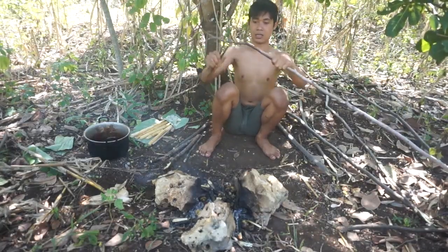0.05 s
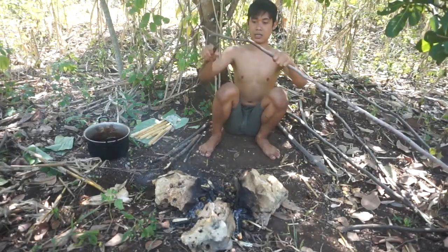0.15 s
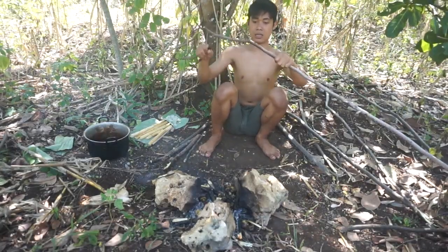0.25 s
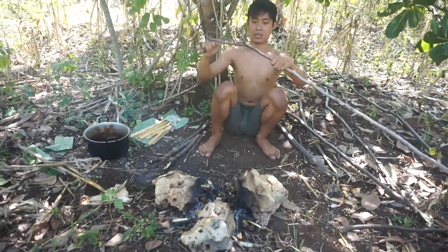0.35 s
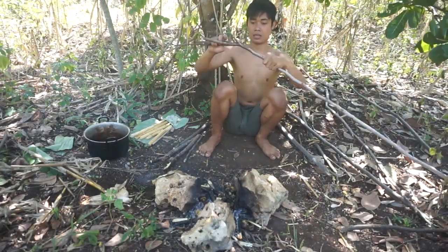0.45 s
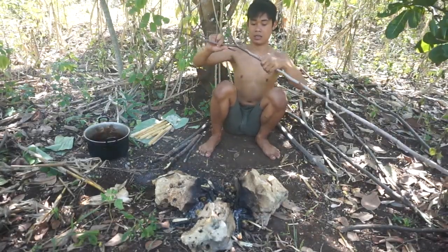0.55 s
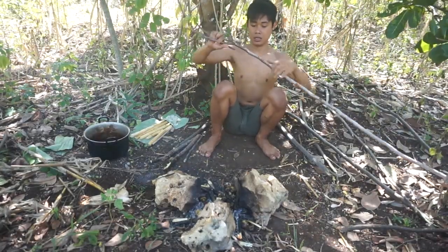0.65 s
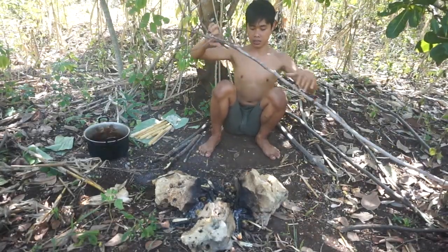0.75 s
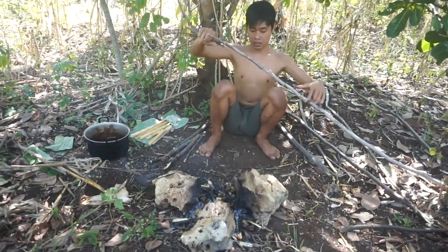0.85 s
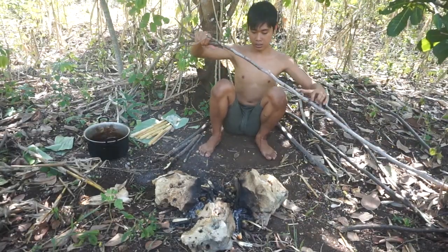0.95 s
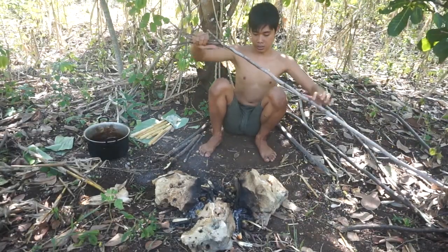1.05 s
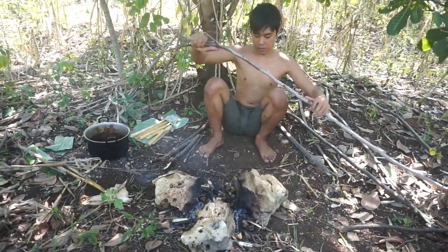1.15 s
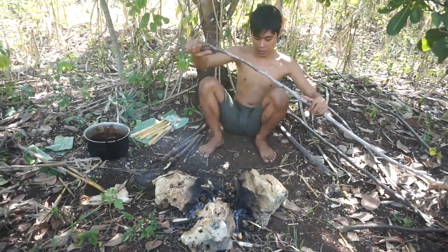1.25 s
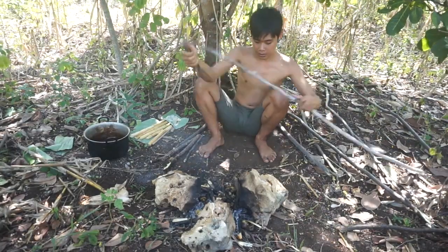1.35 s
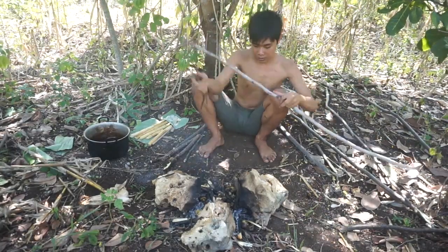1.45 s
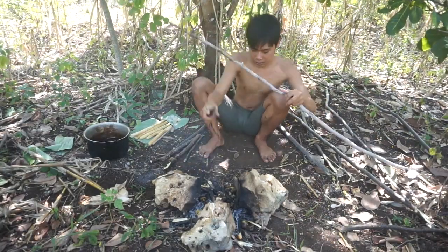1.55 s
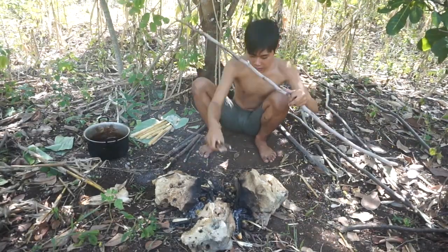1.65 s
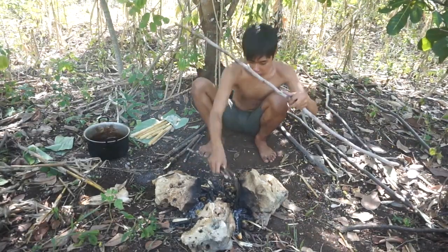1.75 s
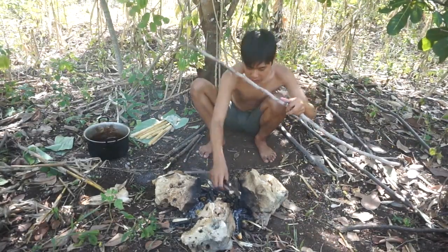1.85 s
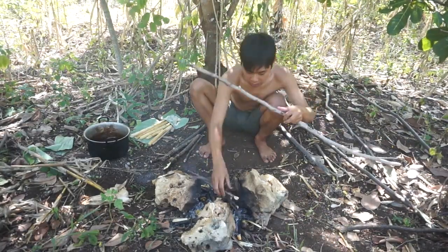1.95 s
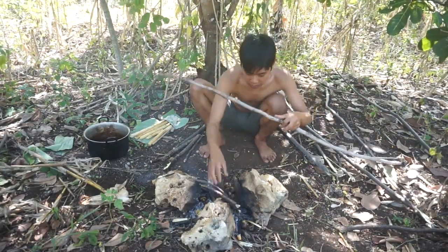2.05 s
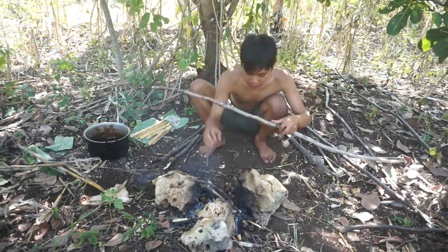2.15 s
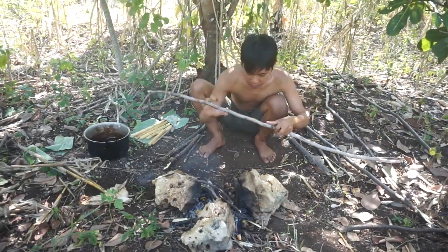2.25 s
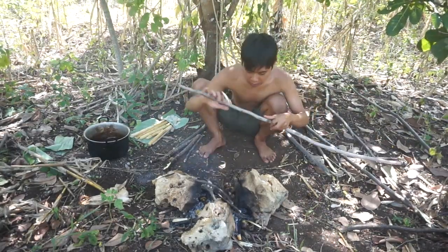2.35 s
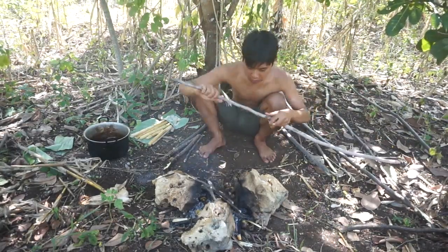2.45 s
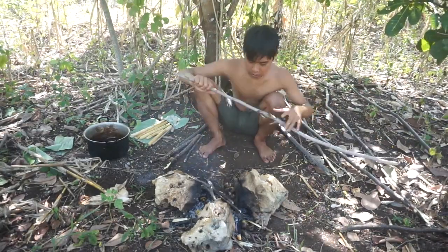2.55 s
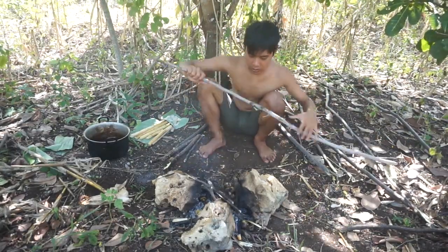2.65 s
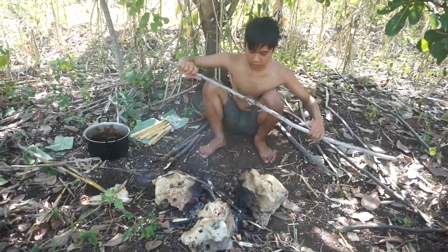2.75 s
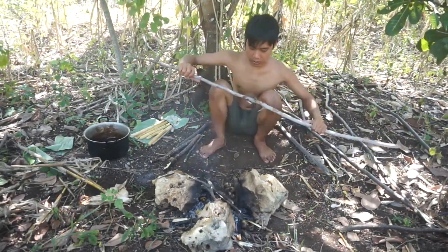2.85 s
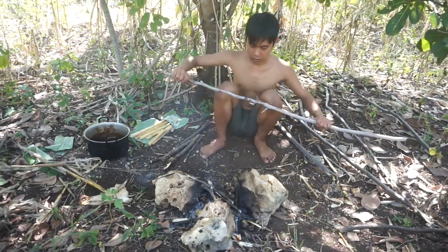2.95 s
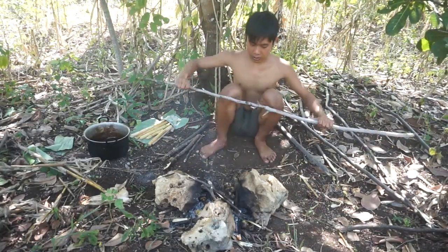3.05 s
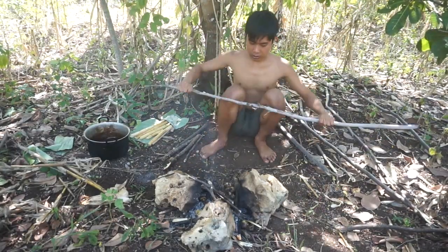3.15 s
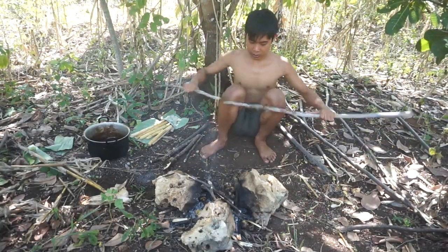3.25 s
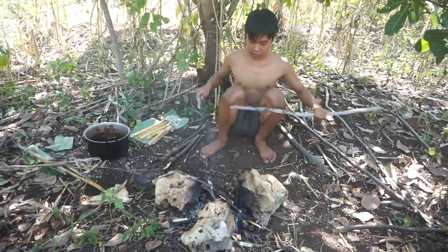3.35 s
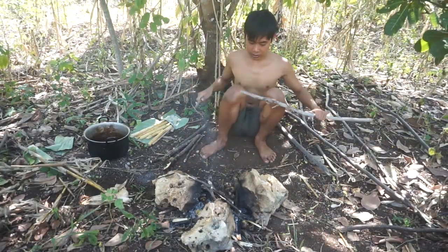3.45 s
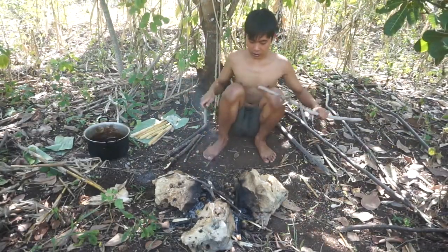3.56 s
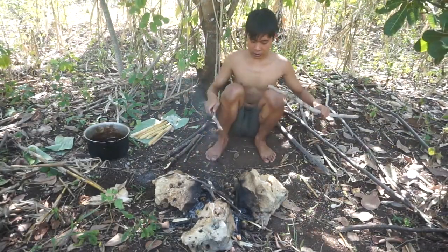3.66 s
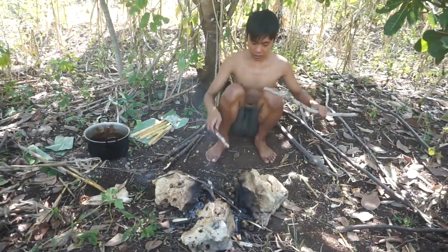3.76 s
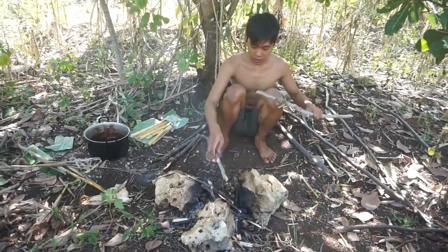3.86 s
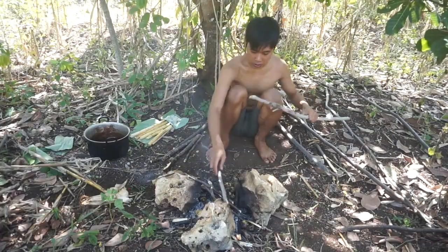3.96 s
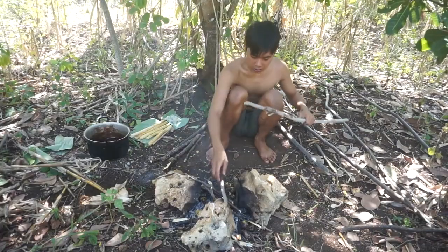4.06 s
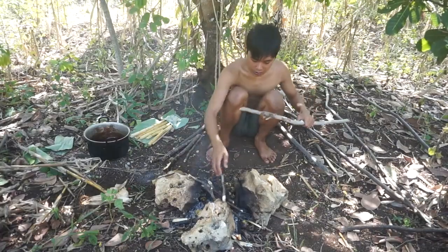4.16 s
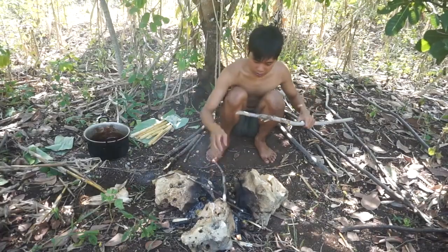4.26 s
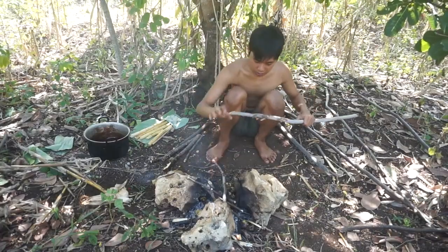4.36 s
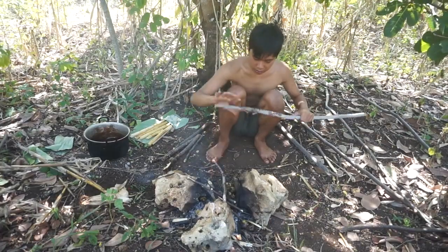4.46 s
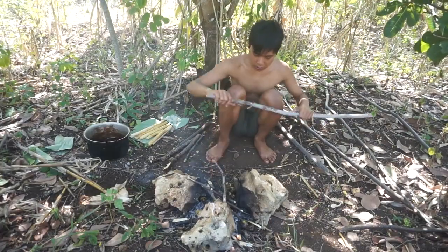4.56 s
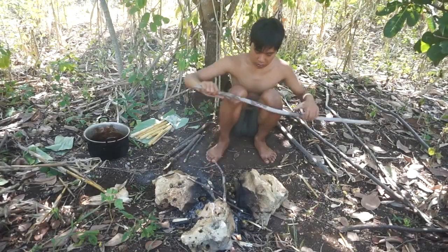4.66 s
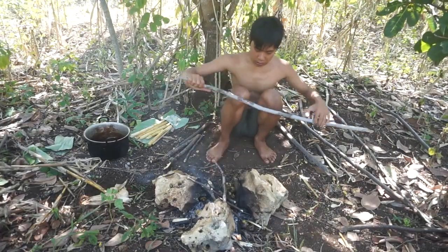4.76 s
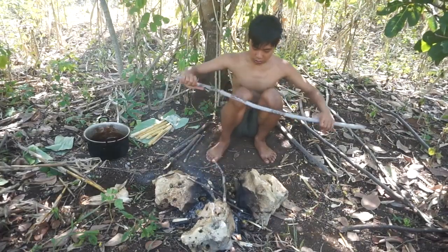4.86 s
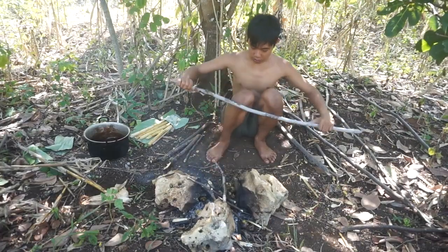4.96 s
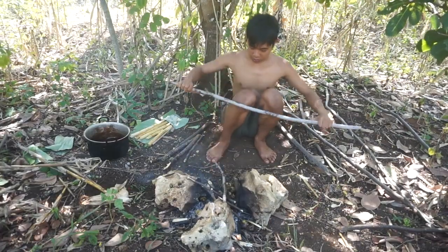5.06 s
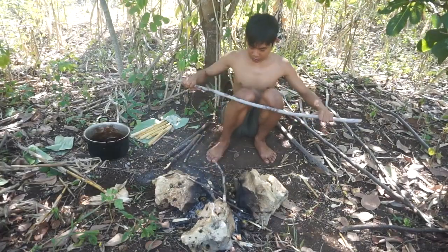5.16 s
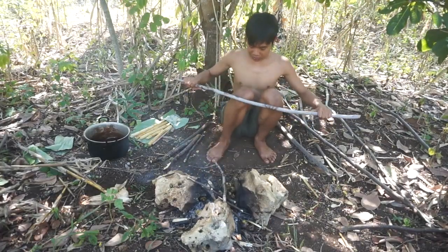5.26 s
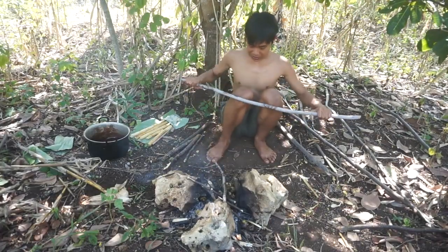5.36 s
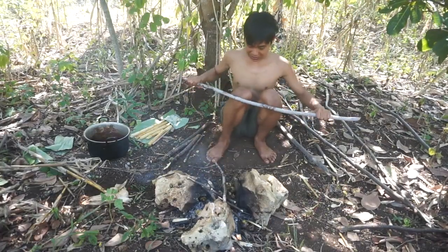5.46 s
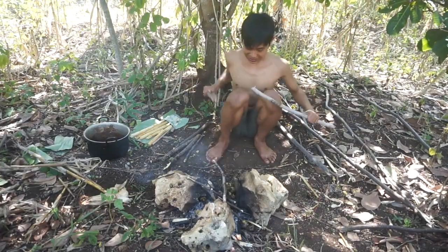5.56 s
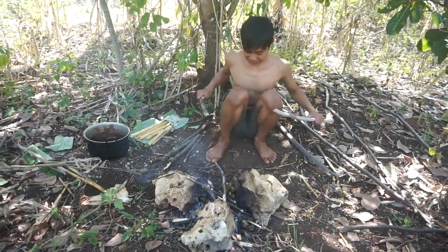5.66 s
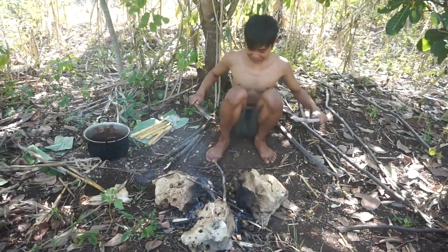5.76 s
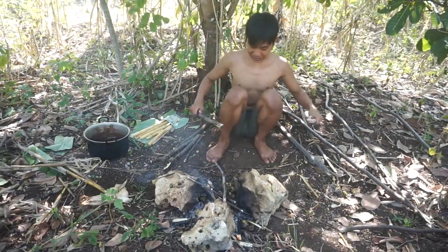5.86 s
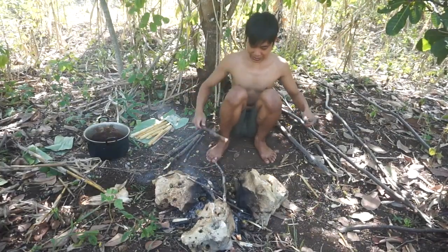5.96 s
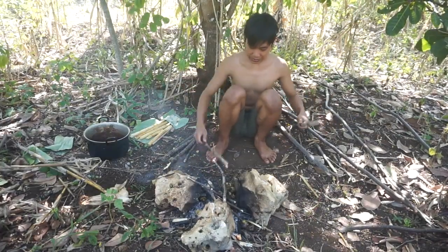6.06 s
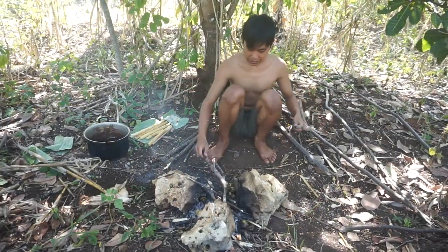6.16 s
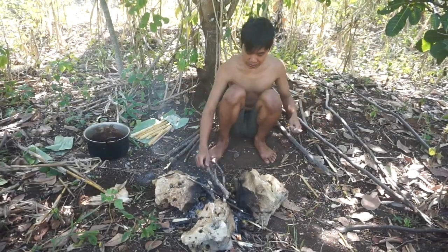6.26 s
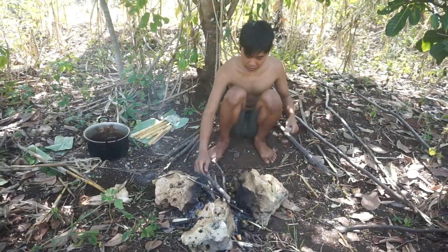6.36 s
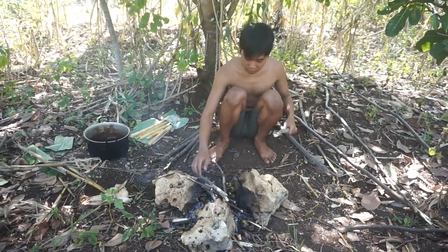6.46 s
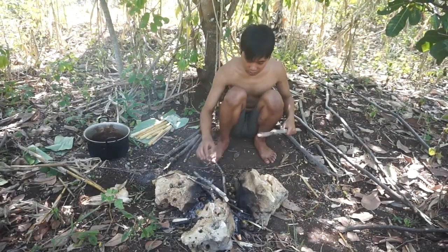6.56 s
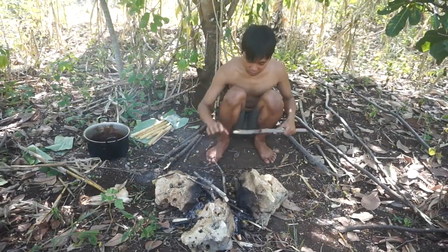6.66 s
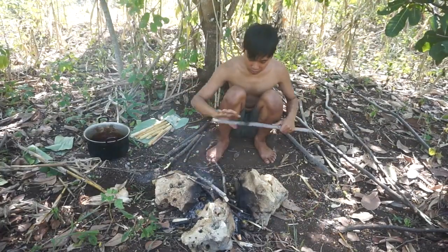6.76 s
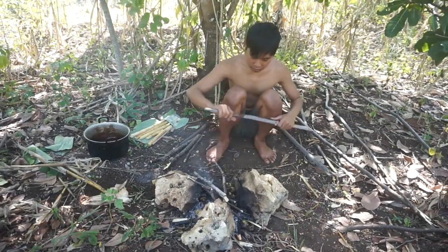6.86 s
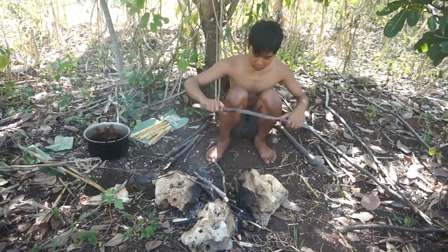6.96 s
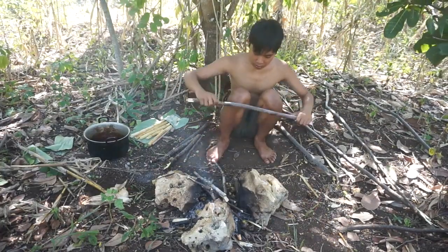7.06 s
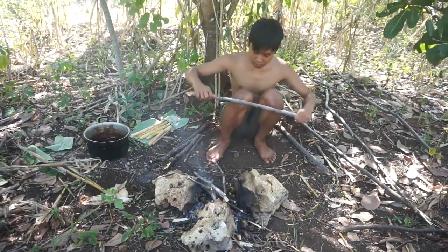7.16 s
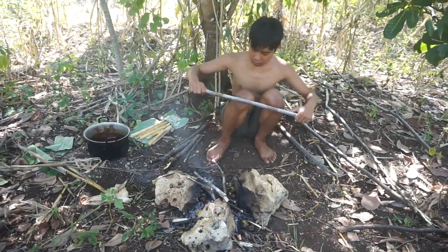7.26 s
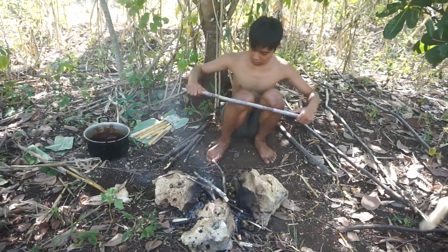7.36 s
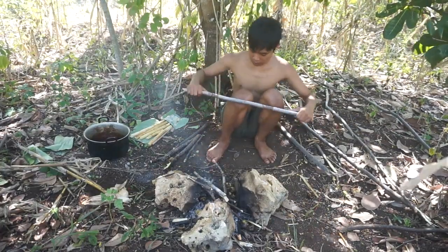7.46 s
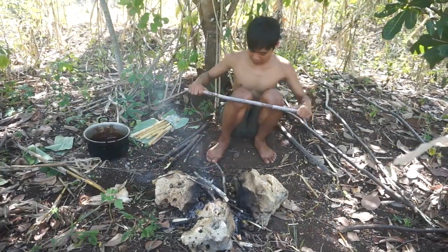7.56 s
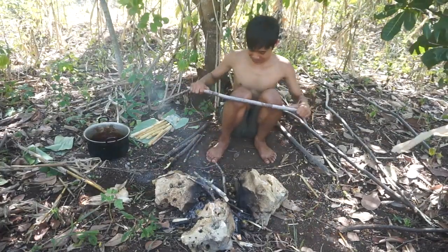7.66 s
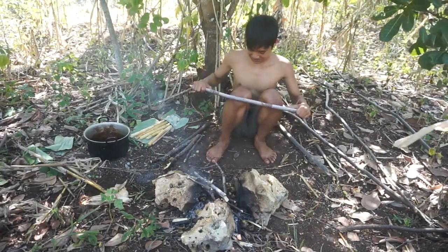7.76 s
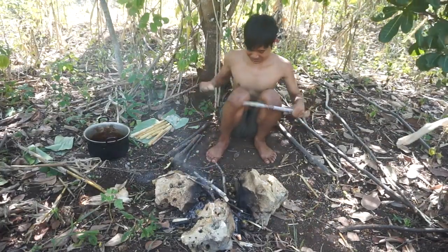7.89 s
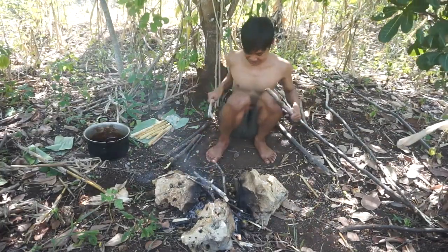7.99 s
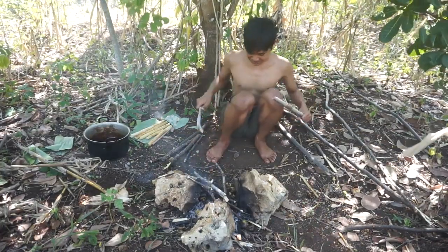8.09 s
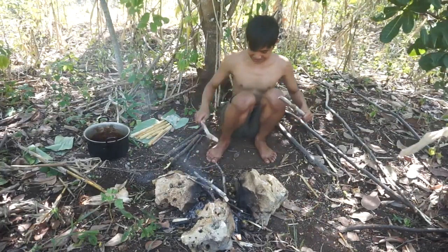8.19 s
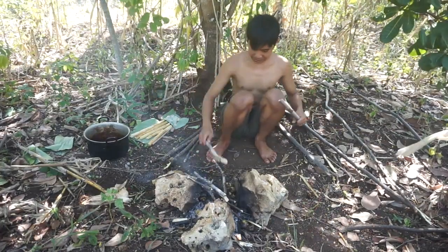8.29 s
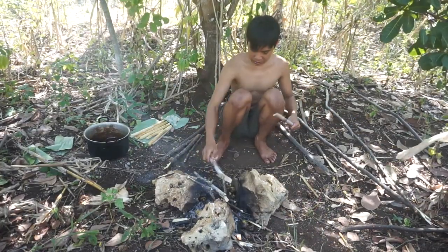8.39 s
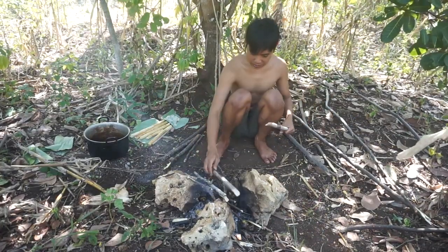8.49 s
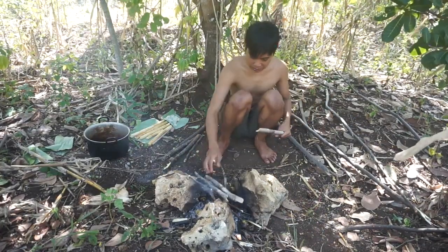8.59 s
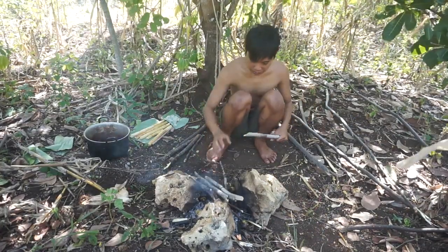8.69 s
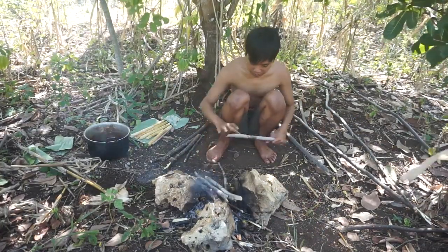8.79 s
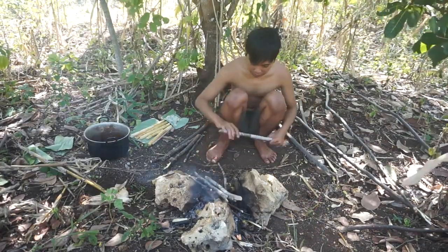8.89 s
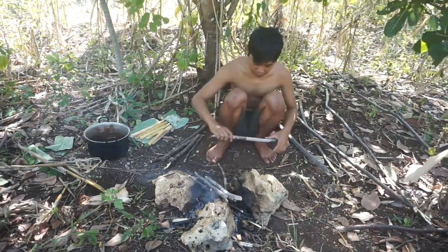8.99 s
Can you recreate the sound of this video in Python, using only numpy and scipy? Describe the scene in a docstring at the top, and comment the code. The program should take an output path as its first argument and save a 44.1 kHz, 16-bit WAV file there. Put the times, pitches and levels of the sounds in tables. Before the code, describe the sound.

Dry leaves crackle under a dragged stick in a faint breezy hush, with small woody taps. Four very loud, short, brittle snaps stand far above everything else, with bright splintering and a quick diffuse tail. Between them come low wind puffs, sparse knocks and thin gliding whistles of a far bird. The open-air microphone's automatic level drops at each snap, then slowly recovers.

```python
"""Dry leaves rustle under a dragged stick in a breezy hush; a light knock of wood follows at once.
Someone crouching by a small wood fire outdoors drags the long stick and breaks it four times.
Small fibre cracks lead up to most breaks; each snap excites wood resonances and scatters back as noise.
Faint gliding calls come from afar. Gusts, noise carried past two ports, buffet the microphone,
whose gain control ducks at every break and creeps back up."""
import sys
import numpy as np
from scipy import signal
from scipy.fft import rfft, irfft
from scipy.io import wavfile
from scipy.ndimage import uniform_filter1d

SR = 44100
rng = np.random.default_rng(int(sys.argv[2]) if len(sys.argv) > 2 else 0)


def materialize(psi):
    """Save the field psi as 16-bit PCM at rate SR to the path in sys.argv[1].

    A 1-D psi becomes a single channel; in a 2-D psi each row is a channel.
    """
    bounded = np.clip(np.atleast_2d(psi).T, -1, 1)
    quanta = np.round(bounded * 32767).astype(np.int16)
    wavfile.write(sys.argv[1], SR, quanta)


N = 398223
TIME = np.arange(N) / SR
BAND_EDGES_HZ = np.geomspace(25, 12800, 19)   # half octaves


def from_db(db):
    """Decibels to amplitude gain."""
    return 10 ** (np.asarray(db) / 20)


def rms_one(x):
    """Scale to rms 1."""
    return x / np.sqrt(np.mean(x ** 2) + 1e-20)


def as_hit(x):
    """Scale a hit to the energy of 3 ms at rms 1."""
    return x / np.sqrt(np.sum(x ** 2) / (.003 * SR) + 1e-20)


def in_time(rows):
    """Breakpoints (t/s, value) interpolated at every sample."""
    return np.interp(TIME, *np.transpose(rows))


def at_hz(rows, hz, axis=1):
    """One table column interpolated over log frequency."""
    rows = np.array(rows)
    return np.interp(np.log(hz), np.log(rows[:, 0]), rows[:, axis])


def band(x, low_hz, high_hz, order=2):
    """Causal Butterworth band-pass."""
    edges_hz = [low_hz, min(high_hz, SR / 2 - 1)]
    sos = signal.butter(order, edges_hz, "band", fs=SR, output="sos")
    return signal.sosfilt(sos, x + 1e-18)


def resonance(x, hz, width_hz):
    """Two-pole resonance, peak gain about 1."""
    r = np.exp(-np.pi * width_hz / SR)
    zeros = np.array([1, 0, -1]) * (1 - r * r) / 2
    poles = [1, -2 * r * np.cos(2 * np.pi * hz / SR), r * r]
    return signal.lfilter(zeros, poles, x)


def drift(rate_hz):
    """Random knots at rate_hz joined by lines, rms 1."""
    knots = rng.standard_normal(int(N / SR * rate_hz) + 2)
    return rms_one(np.interp(TIME * rate_hz, np.arange(len(knots)), knots))


def swell(start_s, length_s, rise_db_per_s, fall_db_per_s):
    """Gain that rises to 1, holds for length_s and dies away, linearly in dB."""
    before_db = (start_s - TIME) * rise_db_per_s
    after_db = (TIME - start_s - length_s) * fall_db_per_s
    return from_db(-np.clip(np.maximum(before_db, after_db), 0, 120))


def add(track, start_s, sound):
    """Mix a sound in at start_s."""
    at = int(start_s * SR)
    track[at:at + len(sound)] += sound[:N - at]


# left-right likeness of diffuse sound: (f/Hz, correlation)
EAR_LIKENESS = [(60, .7), (130, .4), (270, 0.45), (600, 0.24), (2500, 0.31), (5400, 0.061), (11000, 0.19)]


def coloured(excitation, colour, patchy_db):
    """Half-octave stereo bands of mid and side draws, each band flickering on its own; rms 1."""
    out = 0
    for k, (low_hz, high_hz) in enumerate(zip(BAND_EDGES_HZ, BAND_EDGES_HZ[1:])):
        centre_hz = np.sqrt(low_hz * high_hz)
        mid, side = band(excitation[k % 2], low_hz, high_hz)
        alike = np.clip(at_hz(EAR_LIKENESS, centre_hz), -1, 1)
        gain = from_db(at_hz(colour, centre_hz) + patchy_db * drift(25))
        stereo = np.sqrt(1 + alike) * mid + np.sqrt(1 - alike) * side * [[1], [-1]]
        out = out + gain * stereo
    return rms_one(out)


# foliage spectrum: (f/Hz, density/dB per Hz)
FOLIAGE_COLOUR = [(30, -42.5), (100, -29), (350, -6.5), (580, -3), (950, -7), (1500, -3.5), (2500, -1.5),
                  (3300, -3), (4200, -9.5), (6500, -13), (11000, -17)]
# slow swells of the breeze: (t/s, level/dB)
BREEZE_LEVEL = [(0, -64.5), (1, -59), (3, -60.5), (4, -62), (5, -61.5), (7.3, -59.5), (9, -62.5)]


def foliage():
    """Breeze through surrounding leaves: coloured noise on a slow level curve."""
    hush = coloured(rng.standard_normal((2, 2, N)), FOLIAGE_COLOUR, patchy_db=.5)
    return from_db(in_time(BREEZE_LEVEL)) * hush


# faint calls, likely a far bird: (t/s, length/s, start f/Hz, end f/Hz, level/dB)
CALLS = [(3.552, 0.17, 3030, 2990, -58.5), (3.859, .15, 3030, 2935, -62), (4.186, 0.18, 3080, 3020, -67),
         (4.386, 0.118, 2966, 3030, -63.5), (6.989, 0.24, 3600, 3470, -60.5),
         (8.72, 0.22, 3200, 2916, -68.5)]
UPPER_RATIO, UPPER_DB = 1.19, -5   # second, higher strand of each call


def whistles():
    """Far gliding calls in two strands, blurred into narrow noise bands."""
    out = np.zeros((2, N))
    for ratio, strand_db in (1, 0), (UPPER_RATIO, UPPER_DB):
        blur = np.array([drift(420) + 1j * drift(420) for ear in out])
        for start_s, length_s, start_hz, end_hz, db in CALLS:
            along = np.clip((TIME - start_s) / length_s, 0, 1)
            glide_hz = ratio * (start_hz + (end_hz - start_hz) * along)
            phase = 2 * np.pi * np.cumsum(glide_hz) / SR
            envelope = np.sqrt(abs(np.sin(np.pi * along)))
            out += from_db(db + strand_db) * envelope * np.real(blur * np.exp(1j * phase))
    return out


# gusts on the microphone: (t/s, length/s, level/dB before trim and lumps)
GUST_EVENTS = [(0.356, 0.017, -61), (.43, 0.061, -48), (0.62, 0.044, -57), (1.645, .115, -46.5),
               (1.816, 0.014, -53), (1.978, 0.16, -53), (2.427, 0.15, -58.5), (2.713, 0.21, -63.5),
               (2.929, 0.17, -56), (3.176, 0.024, -47.5), (3.253, 0.33, -57.5), (3.751, 0.072, -49),
               (3.926, 0.14, -63), (4.215, .17, -73.5), (4.719, 0.043, -67), (4.879, 0.059, -59.5),
               (5.975, 0.14, -49), (6.301, .02, -61.5), (6.456, .09, -59.5), (6.796, .05, -53.5),
               (6.89, 0.13, -64), (7.233, 0.073, -57.5), (7.339, .11, -61), (7.725, 0.26, -51.5),
               (8.089, 0.087, -49), (8.203, 0.15, -42), (8.38, .15, -40), (8.554, 0.094, -55)]
# eddy spectrum at speed 1: (f/Hz, density/dB per Hz)
EDDY_COLOUR = [(25, -39.5), (45, -36), (75, -12), (115, -7), (180, 1.5), (270, 0.5), (370, -5.5),
               (550, -15.5), (900, -62.5)]
GUST_RISE_DB_PER_S, GUST_FALL_DB_PER_S = 330.5, 351
CALM_DB = -90.5   # floor between gusts


def wind(port_lag_s=0.00091, usual_db=-51, db_per_octave=38, own_share=0.55, trim_db=-0.96):
    """Eddies pass the left port, then the right; stronger gusts run faster: higher pitch, shorter lag."""
    power = from_db(CALM_DB) ** 2
    for start_s, length_s, db in GUST_EVENTS:
        gust = swell(start_s, length_s, GUST_RISE_DB_PER_S, GUST_FALL_DB_PER_S)
        power = power + (from_db(db) * gust) ** 2
    gust_db = 10 * np.log10(power)
    lumps_db = 3.2 * drift(65)
    speed = np.maximum(2 ** ((gust_db - usual_db) / db_per_octave), .7)
    travel = np.cumsum(speed) / SR
    hz = np.arange(1, N // 2 + 2) * SR / N
    spectrum = from_db(at_hz(EDDY_COLOUR, hz)) * (hz < 1500)
    eddies = irfft(rfft(rng.standard_normal((3, N))) * spectrum, N)   # shared, left, right

    def passing(air, lag):
        """Read the frozen eddies at the distance travelled."""
        return np.interp((travel - lag) % TIME[-1], TIME, rms_one(air))

    ports = []
    for k in range(2):
        shared = passing(eddies[0], k * port_lag_s)
        ports.append(shared + own_share * passing(eddies[k + 1], 0))
    return from_db(gust_db + trim_db + lumps_db) * np.array(ports)


# stick sweeps through dead leaves: (t/s, length/s, level/dB, pan/dB up on right and down on left)
LEAF_SWEEPS = [(0, 0.25, -56, 2), (0.503, 0.75, -56, 0.5), (0.717, 0.087, -49.5, 1.5), (.85, 0.084, -49, 2),
               (1.102, 0.036, -52.5, 3), (1.329, 0.018, -38.5, 2), (2.03, 0.6, -59.5, -0.5),
               (2.192, 0.049, -56.5, -6.5), (2.354, 0.042, -53.5, -5), (6.25, 0.69, -66.5, 3.5),
               (6.885, 1.2, -67, -0.5)]
# leaf spectrum: (f/Hz, density/dB per Hz)
LEAF_COLOUR = [(300, -34.5), (550, -17.5), (1200, -12), (1900, -8), (2800, 1), (4000, -6.5), (5500, -9.5),
               (7000, -16.5), (10000, -6), (12500, -18.5)]
SWEEP_RISE_DB_PER_S, SWEEP_FALL_DB_PER_S = 425, 386.5
STIR_DB, STIR_DB_PER_S = -22, 67.5   # faint stir around each sweep


def leaves(grains_per_s=1000, size_db=3.5, hiss=1.0, catch_db=1.0, catches_per_s=45):
    """Sweeps crackle in tiny grains over a smooth scrape, catch unevenly and stir faintly around."""
    power = 0
    for start_s, length_s, db, pan_db in LEAF_SWEEPS:
        sweep = swell(start_s, length_s, SWEEP_RISE_DB_PER_S, SWEEP_FALL_DB_PER_S)
        stir = from_db(STIR_DB) * swell(start_s, length_s, STIR_DB_PER_S, STIR_DB_PER_S)
        side_gain = from_db([[db - pan_db], [db + pan_db]])
        power = power + side_gain ** 2 * (sweep ** 2 + stir ** 2)
    shape = (2, 2, N)
    born = rng.random(N) < grains_per_s * from_db(4 * drift(60)) / SR
    grain_gain = from_db(size_db * np.minimum(rng.exponential(1, N), 4.1))
    grains = born * grain_gain * rng.standard_normal(shape)
    scrape = hiss * rng.standard_normal(shape)
    rustle = coloured(rms_one(grains) + scrape, LEAF_COLOUR, patchy_db=1.04)
    return np.sqrt(power) * from_db(catch_db * drift(catches_per_s)) * rustle


# dry-wood resonances: (f/Hz, width/Hz, mean level/dB)
WOOD_MODES = [(1670, 200, -6.5), (1917, 230, 1), (2370, 310, 6), (2745, 220, 15), (3410, 1100, 3.5),
              (4070, 670, -0.5), (4500, 900, -3.5), (5760, 1900, -26)]


def wood(force, uneven_db=4.0, splintery=0.66):
    """Stick resonances, levels varying per hit, plus broad noise of splitting grain."""
    modes = 0
    for k, (hz, width_hz, db) in enumerate(WOOD_MODES):
        gain = from_db(db + uneven_db * rng.standard_normal())
        modes = modes + (-1) ** k * gain * resonance(force, hz, width_hz)
    return as_hit(modes) + splintery * as_hit(band(force, 1700, 4800))


# light knocks on twigs, ground, hearth stones: (t/s, level/dB, bass re level/dB, stutter decay/ms)
LIGHT_KNOCKS = [(.074, -44, -33, 6), (.316, -49.5, -22, 16), (.562, -39, -12, 13), (0.581, -40.5, -15, 18),
                (.714, -43, -11, 11), (1.738, -47.5, -10.5, 8), (2.147, -49, -14, 2.2),
                (2.183, -57, -17, 3.1), (2.216, -46.5, -3.5, 9), (2.464, -52, -11, 1.9),
                (2.559, -49.5, -1, 8.5), (2.962, -56.5, -5, 3.8), (3.506, -41, -24, 4.3),
                (4.127, -51.5, -34, 3.8), (4.238, -54.5, -4, 14), (6.67, -51.5, -25, 2.8),
                (8.659, -49.5, 3.5, 25)]
KNOCK_TREBLE_DB = -9


def knocks():
    """A light touch: a short decaying stutter of contacts on the same wood."""
    out, t = np.zeros(N), TIME[:SR // 12]
    for start_s, db, bass_db, stutter_ms in LIGHT_KNOCKS:
        force = rng.standard_normal(len(t)) ** 3 * np.exp(-1000 * t / max(stutter_ms, .5))
        dull = from_db(bass_db) * as_hit(band(force, 1150, 2100))
        bright = from_db(KNOCK_TREBLE_DB) * as_hit(band(force, 6200, 11000))
        add(out, start_s, from_db(db) * (as_hit(wood(force)) + dull + bright))
    return out


# stick cracks: (t/s, level/dB, thud trim/dB, treble re body/dB before body share, tear decay/ms,
# ring f/Hz, ring re body/dB)
STICK_CRACKS = [(1.3914, -37, -12, 8.5, 0.47, 3250, 10.5), (1.401, -9.5, -15, -1.5, 0.83, 3770, 0),
                (1.4035, -7.5, -4.5, -14, 1.1, 2810, 6.5), (3.351, -12, -21, -4.5, 2.23, 2460, -16),
                (5.3078, -36, 1, 7, 0.38, 3640, -6), (5.318, -39, -12, -0.5, .5, 2960, -4.5),
                (5.327, -44, -26, 6, .4, 3460, 0.5), (5.357, -53, -10, 13, 0.88, 3000, -10),
                (5.387, -54, -4, -7, 0.63, 2310, -8), (5.4345, -45, -1, -.5, 0.22, 2260, -8.5),
                (5.4828, -60.5, 4, 11, 0.37, 2960, -8), (5.5107, -42.5, -13, 4, 0.79, 2370, -8.5),
                (5.5141, -46.5, -13.5, 8.5, 0.93, 3440, -10.5), (5.524, -54, -2, 9, .5, 2300, -12.5),
                (5.5743, -7, -5, -2, 1.1, 2680, -5.5), (7.749, -44, -10, -1, 11.5, 2560, -14),
                (7.779, -30.5, -16.5, 0.5, 1.17, 2570, -9.5), (7.913, -50.5, 5.5, 3, 2.23, 2610, -15),
                (7.938, -56, -6, 11.5, 3.8, 2630, -7.5), (7.9734, -8, -21.5, -1, 0.92, 4080, -11.5),
                (7.9739, -13.5, -7, -9.5, 1.1, 1776, 3.5)]


def cracks(first_share=0.27, ring_width_hz=130, thud_db=-14, hand_db=-32):
    """One fibre bundle gives way, the rest tear within ms, the freed piece rings: (bursts, ringing)."""
    bursts, ringing, t = np.zeros(N), np.zeros(N), TIME[:SR // 16]
    first = as_hit(1. * (t == 0))
    for start_s, db, bass_db, treble_db, tear_ms, ring_hz, ring_db in STICK_CRACKS:
        fibres = as_hit(rng.standard_normal(len(t)) * np.exp(-1000 * t / max(tear_ms, .1)))
        force = first_share * first + fibres
        body_share = 1 / np.hypot(1, from_db(ring_db))   # body and ring share the energy
        body = body_share * as_hit(wood(force))
        thud = from_db(thud_db) * as_hit(band(force, 850, 1650))
        thud = thud + from_db(hand_db) * as_hit(band(force, 120, 700))
        splinter = as_hit(band(force, 7400, 10000) + 1.9 * resonance(force, 10000, 820))
        burst = body + from_db(bass_db) * thud + from_db(treble_db) * splinter
        ring = body_share * as_hit(resonance(first, ring_hz, ring_width_hz))
        add(bursts, start_s, from_db(db) * burst)
        add(ringing, start_s, from_db(db + ring_db) * ring)
    return bursts, ringing


# scatter from ground and stones: (f/Hz, level/dB, t60/s)
GROUND_RETURN = [(500, -17.5, 0.15), (1200, -7, 0.051), (2800, -3, 0.1), (5030, 2, 0.12), (10000, -4, 0.12)]
# scatter from trees further off: (f/Hz, level/dB, t60/s)
TREE_RETURN = [(500, -32.5, 0.37), (1217, -22, 0.48), (2800, -14.5, 0.84), (5000, -11.5, .6),
               (10000, -16.5, 0.6)]


def scatter(x, gap_s=.0015):
    """Countless small reflections: band energy returns as dying noise, different at each ear."""
    out, white = 0, rng.standard_normal((2, 2, N))
    x = np.interp(TIME - gap_s, TIME, x)
    for k, (low_hz, high_hz) in enumerate(zip(BAND_EDGES_HZ[8:], BAND_EDGES_HZ[9:])):
        centre_hz = np.sqrt(low_hz * high_hz)
        power, returned = band(x, low_hz, high_hz) ** 2 + 1e-20, 0
        for surroundings in GROUND_RETURN, TREE_RETURN:
            db = at_hz(surroundings, centre_hz, axis=1)
            t60_s = at_hz(surroundings, centre_hz, axis=2)
            keep = from_db(-60 / (t60_s * SR)) ** 2   # power kept per sample
            returned = returned + from_db(db) ** 2 * signal.lfilter([1 - keep], [1, -keep], power)
        out = out + np.sqrt(returned) * rms_one(band(white[k % 2], low_hz, high_hz))
    return out


def to_the_right(x, pan_db, lag_samples):
    """Delay the left port by lag_samples; pan_db raises right and lowers left."""
    return np.array([np.roll(x[0], lag_samples), x[1]]) * from_db([[-pan_db], [pan_db]])


def scene(wood_lean=.25, ring_scatter_db=-7):
    """Stick in front, leaves and foliage reaching the right port first, wind on the microphone."""
    around = to_the_right(foliage(), pan_db=0.23, lag_samples=2)
    around = around + to_the_right(leaves(), pan_db=-0.2, lag_samples=3)
    bursts, ringing = cracks()
    bursts = bursts + knocks()
    stick = bursts + ringing
    # the long end points right and radiates the middle range
    direct = stick + wood_lean * band(stick, 700, 3300, order=1) * [[-1], [1]]
    # bursts spread all round; the piece rings broadside, mostly towards the microphone
    returned = scatter(bursts + from_db(ring_scatter_db) * ringing)
    return around + whistles() + wind() + direct + returned


def gain_control(x, threshold_db=-24, slope=1.8, most_db=13, release_db_per_s=15):
    """A loud snap pulls the gain down within ms; it recovers at a steady dB rate."""
    power = uniform_filter1d(np.mean(x ** 2, axis=0), size=130)
    level_db = 10 * np.log10(np.maximum(power, 1e-12))
    cut_db = np.clip(slope * (level_db - threshold_db), 0, most_db)
    released_db = release_db_per_s * TIME
    held_db = np.maximum.accumulate(cut_db + released_db) - released_db
    return x * from_db(-uniform_filter1d(held_db, size=30))


CUTOFF_HZ = 11050


def record(dry):
    """Gain control, then a steep elliptic low-pass."""
    low_pass = signal.ellip(10, .3, 70, CUTOFF_HZ, fs=SR, output="sos")
    return signal.sosfilt(low_pass, gain_control(dry))


dry = scene()
out = record(dry)
materialize(out)
```